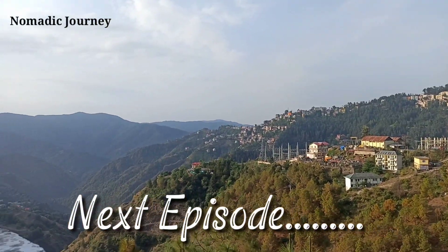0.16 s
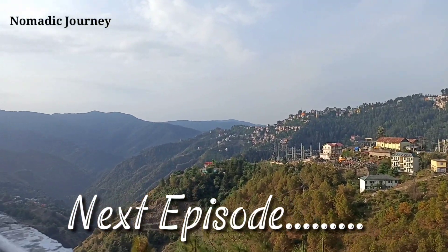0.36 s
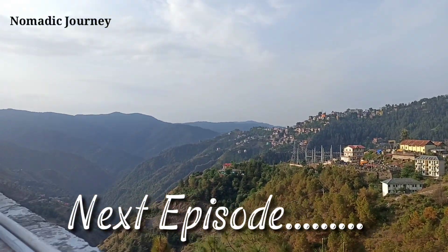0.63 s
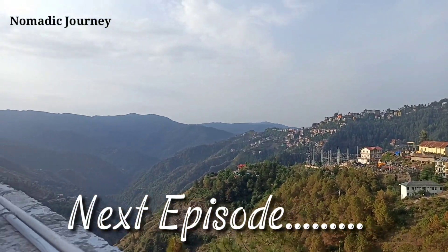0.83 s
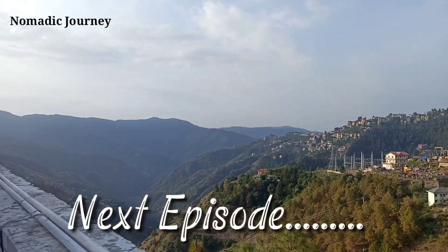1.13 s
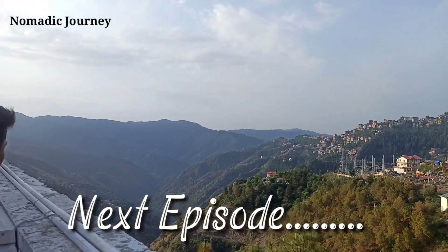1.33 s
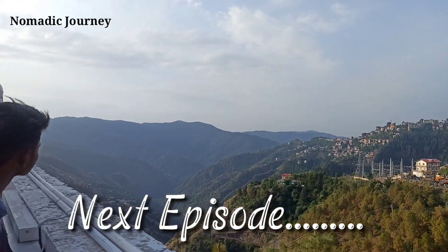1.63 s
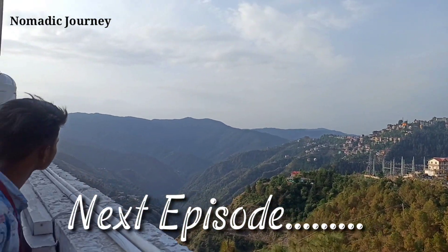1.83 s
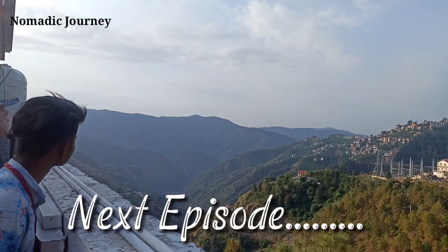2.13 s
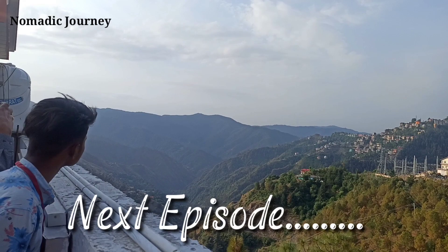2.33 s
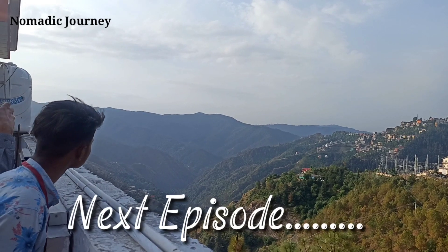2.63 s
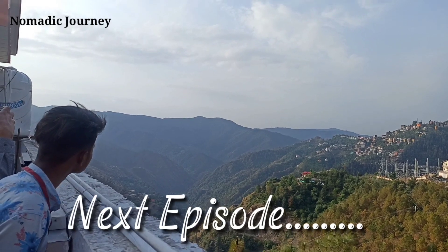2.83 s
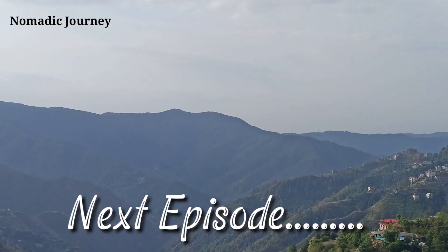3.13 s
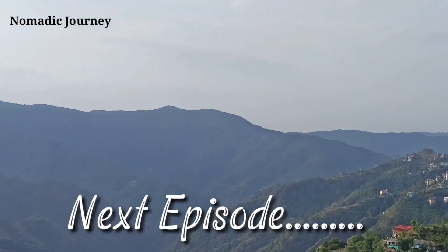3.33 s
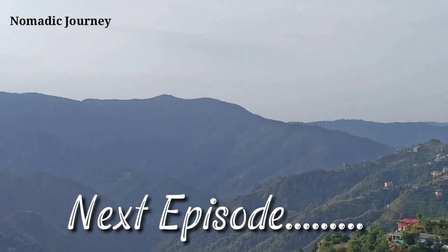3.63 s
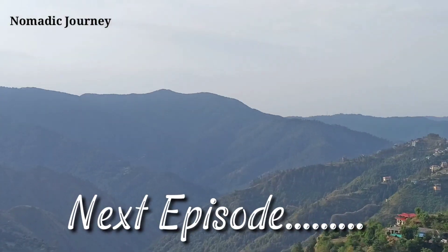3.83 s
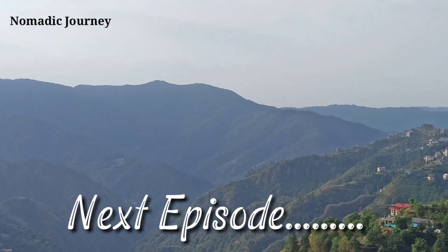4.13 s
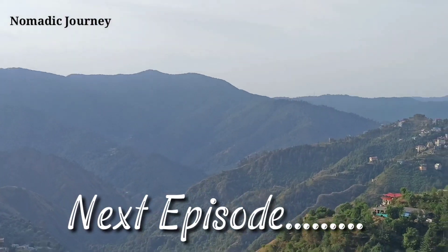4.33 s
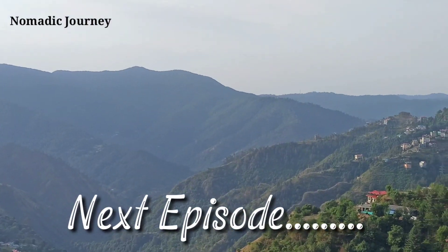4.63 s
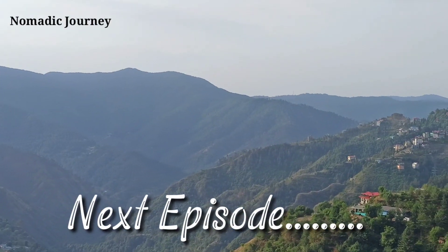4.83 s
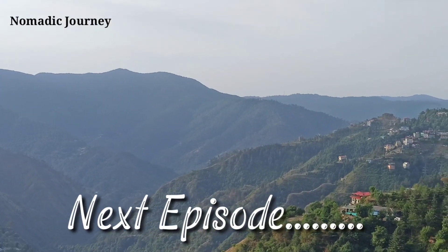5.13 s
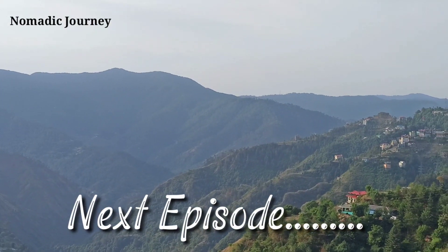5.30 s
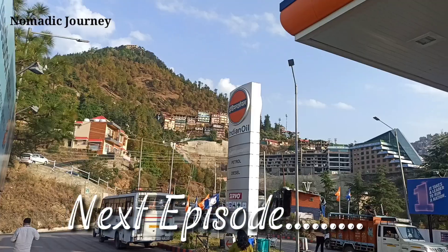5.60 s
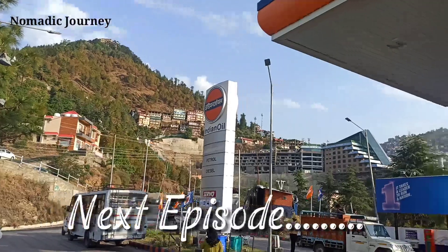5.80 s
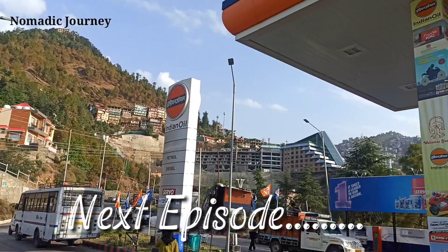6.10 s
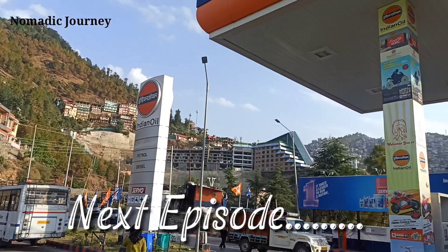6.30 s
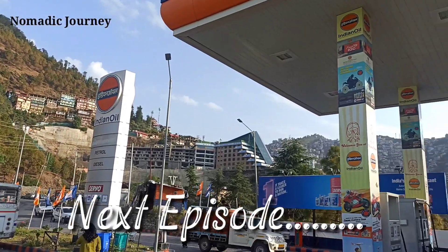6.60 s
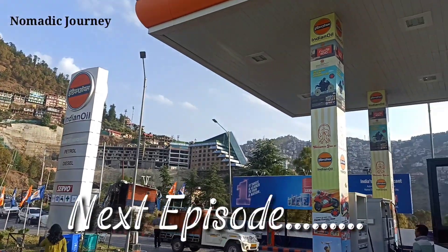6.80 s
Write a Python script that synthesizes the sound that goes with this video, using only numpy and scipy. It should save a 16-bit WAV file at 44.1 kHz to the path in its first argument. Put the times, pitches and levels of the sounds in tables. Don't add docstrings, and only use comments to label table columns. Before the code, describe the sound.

From 0 to 5.6 seconds, an outdoor hillside is dominated by a strong, steady low idle, its main hum near 96 hertz, beating roughly ten times a second against a weaker second engine. A brief hiss dies away at the very start. Soft valley road roar swells gently from about 1.3 seconds, while another vehicle pulls away at 1.3 to 2.2, revs climbing at the end. Tiny birds give short gliding whistles, mostly at 0.5-1.2, 1.7-2, 2.7-3.8 and 4.5-5. Leaves rustle in short gusts; twigs snap near 3.6 and 5.1. At 5.63 everything cuts to a brief silence. From 5.71 a forecourt fades in, full by 5.9: a quieter, higher hum with beating, rapid four-cylinder knocking and metallic panel rattle, puffing exhaust, broad traffic roar, and quick bird chirps at 6.1-6.4 and 6.65-6.8.

```python
import sys
import numpy as np
from scipy import signal
from scipy.io import wavfile
from scipy.ndimage import uniform_filter1d

SR = 44100
rng = np.random.default_rng(int(sys.argv[2]) if len(sys.argv) > 2 else 0)


def field_ratio(decibels):
    return 10 ** (np.asarray(decibels, dtype=float) / 20)


def generate_wav(signal):
    frames = np.transpose(np.atleast_2d(signal))
    scaled = np.clip(frames, -1, 1) * 32767
    pcm = np.round(scaled).astype(np.int16)
    wavfile.write(sys.argv[1], SR, pcm)


N = 306495
T = np.arange(N) / SR

CUT_S, SILENCE_S, RETURN_S = 5.6254, 5.645, 5.708
HILL_CYCLE_HZ, FAST_CYCLE_HZ, KNOCK_CYCLE_HZ = 7.9746, 11.304, 7.087


def evened(x):
    return x / np.sqrt(np.mean(abs(x) ** 2) + 1e-30)


def curve(rows, column=1):
    rows = np.array(rows)
    return np.interp(T, rows[:, 0], rows[:, column])


def bumps(rows):
    t = T[::64]
    swells = sum(high * np.exp(-2 * ((t - s) / half) ** 2) for s, high, half in rows)
    return np.interp(T, t, swells)


def wander(hz):
    t = T[::64]
    rates = np.geomspace(hz / 20, hz, num=12)
    slow = sum(np.sin(2 * np.pi * (f * t + rng.random())) for f in rates)
    return np.interp(T, t, evened(slow))


def sine(phase, db):
    return np.sqrt(2) * field_ratio(db) * np.cos(phase)


def resonate(x, hz, width):
    turn = np.exp(2j * np.pi * np.cumsum(hz * np.ones(len(x))) / SR)
    r = np.exp(-np.pi * width / SR)
    return 2 * (turn * signal.lfilter([1 - r], [1, -r], x / turn)).real


def noise(lo, hi, points=None, patchy_db=1.):
    hz = np.fft.rfftfreq(2048, 1 / SR)
    a, b, patches = rng.standard_normal((N // 512 + 5, len(hz), 3)).T
    patches = uniform_filter1d(patches, size=20, axis=0)
    patches = evened(uniform_filter1d(patches, size=7, axis=1))
    colour = 0 * hz
    if points is not None:
        f, db = np.transpose(points)
        colour = np.interp(np.log(hz + 1), np.log(f + 1), db)
    inside = (hz >= lo) & (hz < hi)
    z = (a + 1j * b) * field_ratio(colour[:, None] + patchy_db * patches) * inside[:, None]
    return evened(signal.istft(z, nperseg=2048, noverlap=1536)[1][:N])


def shelves(edges, levels_db):
    whole = np.fft.rfft(noise(edges[0], edges[-1]))
    hz = np.fft.rfftfreq(N, 1 / SR)
    cuts = [np.fft.irfft(whole * ((hz >= lo) & (hz < hi)), N) for lo, hi in zip(edges, edges[1:])]
    return [field_ratio(db) * evened(cut) for cut, db in zip(cuts, levels_db)]


def engine(angle, orders, orders_db, unsteady_db):
    total = 0
    for k, db in zip(orders, orders_db):
        pipe_shift = .008 * (k - 12) ** 2
        total = total + sine(k * angle + pipe_shift, db + unsteady_db * (.3 - db / 30) * wander(6))
    return total


HILL_ORDERS = [6, 12, 13, 18, 24, 25, 26, 29, 30, 36, 37, 42, 43, 47, 48, 54, 60, 66, 67, 72, 79, 84, 90,
               96]
HILL_ORDER_DB = [-36.5, 0.5, -30, -14, -28, -48, -32.5, -33.5, -25.5, -27, -37, -33.5, -40.5, -41.5, -30.5,
                 -38.5, -42.5, -37.5, -31, -36, -51, -41, -49.5, -43]
# (t/s, level/dB)
HUM = [(0.0, -33), (0.31, -32), (0.98, -33), (1.73, -33), (2.54, -34), (5.49, -34.5), (5.6, -33.5)]


def hill_engine(angle):
    return field_ratio(curve(HUM)) * engine(angle, HILL_ORDERS, HILL_ORDER_DB, unsteady_db=0.66)


FAST_ORDERS = [6, 9, 10, 12, 13, 14, 15, 18, 19, 20, 24, 30, 36, 37, 40, 42, 43, 48]
FAST_ORDER_DB = [-19, -20, -18, 0, -17, -22, -15, -12, -20, -22, -15, -16, -15, -24, -23, -24, -23, -22]


def fast_engine(angle):
    return field_ratio(-43) * engine(angle, FAST_ORDERS, FAST_ORDER_DB, unsteady_db=1.2)


# (f/Hz, level/dB, starting phase/rad)
HILL_NEIGHBOURS = [
    (85.82, -48, 3.97),
    (25.8, -63, 0),
    (70, -64, 0),
]
# (f/Hz, level/dB, starting phase/rad)
FAST_NEIGHBOURS = [
    (122.85, -47, 0),
    (36, -73, 0),
]


def neighbours(lines, t):
    return sum(sine(2 * np.pi * hz * t + start, db + 0.5 * wander(0.82)) for hz, db, start in lines)


# (t/s, firing f/Hz, level/dB)
PULLING = [
    (.9, 48.5, -72),
    (1.3, 50, -55),
    (1.7, 52.5, -52),
    (2, 54.8, -50),
    (2.09, 58, -48.5),
    (2.17, 65, -50),
    (2.23, 69, -75),
]


def pulling_away():
    phase = 2 * np.pi * np.cumsum(curve(PULLING)) / SR
    orders = sum(sine(k * phase, db) for k, db in zip(range(2, 7), [-5, 0, -5, -14, -15]))
    passing = (T > PULLING[0][0]) * (T < PULLING[-1][0])
    return orders * field_ratio(curve(PULLING, column=2)) * passing


PANEL_HZ = [540, 595, 650, 828, 893, 952, 1100, 1240, 1380, 1460, 2000, 2650]
PANEL_WIDTH_HZ = [25, 10, 50, 25, 15, 10, 25, 25, 10, 25, 200, 110]
PANEL_DB = [-62, -57, -61, -57, -63, -61, -66, -65, -60, -63, -70, -66]
CYLINDERS = [1, -.6, .7, .6]


def knocking():
    start = int(CUT_S * SR)
    at = (np.arange(5.748, T[-1], 1 / KNOCK_CYCLE_HZ / 4) * SR).astype(int) - start
    even, uneven, tick = np.zeros((3, N - start))
    even[at] = field_ratio(.8 * rng.standard_normal(len(at)))
    uneven[at] = even[at] * np.resize(CYLINDERS, len(at))
    tick[at[::4]] = even[at[::4]]
    rings = 0
    for hz, width, db in zip(PANEL_HZ, PANEL_WIDTH_HZ, PANEL_DB):
        blow = even if hz < 700 else uneven if hz < 1700 else tick
        ring = resonate(resonate(blow, hz, 4 * width), hz, width)
        rings = rings + field_ratio(db) * evened(ring)
    dulled = signal.sosfilt(signal.butter(6, 3500, fs=SR, output="sos"), rings)
    return np.pad(dulled, (N - len(dulled), 0))


def chug(t):
    since = (t + 0.011) % (1 / KNOCK_CYCLE_HZ) / .008
    air = noise(700, 3300, [(700, -2), (1400, 3), (1800, -5), (2300, 1), (2650, 9), (2950, -4), (3300, -8)])
    return air * field_ratio(-50) * since * np.exp(1 - since)


# (t/s, length t/s, start f/Hz, end f/Hz, level/dB)
HIGH_BIRD = [(0.572, 0.06, 4480, 4620, -56), (.6, 0.07, 4730, 4750, -59), (0.795, .065, 4660, 4750, -58.5),
             (0.93, 0.12, 4500, 4680, -56.5), (1.089, 0.054, 4470, 4550, -52), (1.17, .06, 4530, 4450, -64),
             (2.737, 0.051, 4530, 4600, -56.5), (2.926, 0.047, 4720, 4490, -52),
             (3.39, 0.045, 4400, 4600, -63), (3.67, 0.066, 4420, 4700, -54.5),
             (3.75, 0.024, 4540, 4520, -64), (4.491, 0.039, 4540, 4630, -50),
             (4.568, 0.087, 4695, 4680, -47.5), (4.61, 0.11, 4680, 4480, -56), (4.74, .1, 4420, 4400, -65),
             (4.94, .06, 4400, 4400, -61.5)]
MIDDLE_BIRD = [(0.058, 0.1, 3930, 4000, -59.5), (.17, 0.046, 3750, 4050, -65.5),
               (.2, 0.066, 4200, 4310, -62.5), (.74, .035, 4150, 4080, -68), (1.25, .03, 4300, 3950, -64),
               (2.8, 0.067, 4170, 4000, -64), (3.033, 0.055, 4070, 3900, -48.5),
               (3.42, 0.063, 4200, 3830, -60.5)]
LOW_BIRD = [(2.772, 0.021, 3230, 3090, -61), (2.848, 0.027, 2955, 3300, -55),
            (2.961, 0.053, 2950, 2810, -64), (3.004, 0.036, 2700, 3600, -53.5),
            (3.077, 0.033, 3753, 2720, -49.5), (3.154, 0.032, 2674, 3560, -53.5),
            (3.215, .018, 3210, 2750, -64), (3.358, 0.024, 3134, 3070, -70),
            (3.508, 0.089, 2810, 3250, -59.5), (3.641, 0.033, 3180, 3300, -61.5),
            (3.75, 0.018, 3170, 3050, -68), (3.798, 0.033, 3020, 3420, -66),
            (4.52, 0.024, 2680, 3320, -58.5), (4.584, 0.05, 2890, 3300, -56.5),
            (4.673, 0.024, 3280, 3020, -58.5), (4.72, .04, 3200, 3080, -63),
            (4.909, 0.029, 3030, 3200, -65), (5.001, 0.032, 3080, 3030, -63), (3.92, .03, 3080, 3250, -69)]
WHISTLER = [
    (1.684, .05, 1863, 2630, -54),
    (1.782, 0.036, 2298, 1770, -54),
    (1.98, 0.058, 2145, 2610, -55),
]
FAST_LOW_BIRD = [(6.088, .028, 3970, 4860, -55), (6.145, 0.016, 4700, 4070, -54),
                 (6.35, .02, 4080, 3700, -60), (6.49, 0.015, 3780, 3820, -59),
                 (6.646, .02, 4120, 4320, -55), (6.692, 0.02, 4500, 4020, -50.5),
                 (6.735, 0.039, 3910, 4700, -48), (6.775, 0.016, 4430, 3800, -52)]
FAST_HIGH_BIRD = [(6.106, 0.028, 6400, 6230, -51.5), (6.11, 0.076, 5830, 5550, -62),
                  (6.155, .03, 6250, 6300, -58), (6.205, 0.02, 6480, 6900, -49),
                  (6.3, 0.0079, 6180, 6080, -59), (6.338, 0.033, 6750, 6700, -55),
                  (6.342, 0.024, 6250, 6250, -56), (6.66, 0.038, 5830, 5600, -53.5)]


def whistle(length, hz0, hz1, db, blur):
    t = np.linspace(0, 1, int(length * SR))
    hz = hz0 + (hz1 - hz0) * t
    fuzz = rng.standard_normal(len(t))
    for width in (2 * blur, 2 * blur, blur):
        fuzz = resonate(fuzz, hz, width)
    clear = sine(2 * np.pi * np.cumsum(hz) / SR, -blur / 40)
    return field_ratio(db) * (min(blur / 120, 1) * evened(fuzz) + clear) * np.sin(np.pi * t) ** .6


def birds():
    out = np.zeros(N)
    flock = [(HIGH_BIRD, 185), (MIDDLE_BIRD, 190), (LOW_BIRD, 150), (WHISTLER, 50),
             (FAST_LOW_BIRD, 120), (FAST_HIGH_BIRD, 180)]
    for notes, blur in flock:
        for s, *shape in notes:
            note = whistle(*shape, blur)
            out[int(s * SR):][:len(note)] += note
    t = T[:6000]
    trees = rng.standard_normal(len(t)) * field_ratio(-60 * t / .15) * (t > .006)
    return out + field_ratio(-6) * signal.oaconvolve(out, trees / np.linalg.norm(trees))[:N]


# (t/s, level/dB, centre f/Hz, width f/Hz)
SNAPS = [
    (0.309, -73, 5000, 1680),
    (.6, -81, 8330, 497),
    (1.362, -78, 9800, 3000),
    (3.541, -67, 1720, 796),
    (3.625, -61, 4900, 1000),
    (3.641, -60.5, 1730, 800),
    (5.088, -60.5, 5300, 1200),
    (5.088, -70.5, 9800, 2940),
]


def snaps():
    out = np.zeros(N)
    t = np.arange(1500) / SR
    for s, db, hz, width in SNAPS:
        band = signal.butter(4, [hz - width / 2, hz + width / 2], "band", fs=SR, output="sos")
        burst = evened(signal.sosfilt(band, rng.standard_normal(len(t))))
        swell = (t / 0.0014) * np.exp(1 - t / 0.0039)
        out[int((s - .004) * SR):][:len(t)] += field_ratio(db) * burst * swell
    return out


# (f/Hz, level/dB per Hz)
HILL_ROAR = [(12, -59), (20, -33.5), (38, -25), (63, -14), (97, -7.5), (120, -12.5), (189, -21),
             (293, -19.5), (469, -26), (537, -23.5), (750, -36), (980, -75), (1650, -120)]
# (f/Hz, level/dB)
HILL_MID = [(440, -32), (750, -3), (829, -5), (1080, -8), (1370, 1.5), (1470, 0.5), (1620, -4.5),
            (2080, -4), (2240, 1), (2390, -2.5), (3170, -5.5), (3350, -11), (4360, -41), (7370, -120)]
# (t/s, level/dB)
ROAD = [(0, -4.5), (.7, -3), (1.35, 2), (2.1, 2), (2.65, 0), (3.1, 2), (3.6, 0.5), (4.4, -1), (5.6, 0)]


def hill_roar(puffing, gusts):
    low = noise(20, 750, HILL_ROAR) * field_ratio(-49.5)
    middle = noise(750, 3350, HILL_MID) * field_ratio(-57.5 + .1 * gusts) * puffing
    dull = signal.sosfiltfilt(signal.butter(3, 1900, fs=SR, output="sos"), middle)
    road = curve(ROAD)
    return low + dull * field_ratio(0.71 * road) + (middle - dull) * field_ratio(0.52 * road)


# (t/s, rise level/dB, half length t/s)
GUSTS = [(0.01, 6, 0.13), (.31, 3, .03), (.51, 7, .04), (.86, 1, .04), (1.365, 5, 0.019), (2.22, 4, .06),
         (2.8, 1, .08), (3.03, 5.5, 0.066), (3.46, 5, .07), (3.54, 10.5, 0.016), (3.63, 7, 0.067),
         (4.4, 4, .05), (4.6, 3.5, .06), (4.76, 8, 0.037), (5.08, 12, 0.053), (5.6, 3, 0.055)]
HILL_EDGES = [3350, 4280, 4820, 5380, 5980, 6700, 8180, 11900, 15500]
HILL_SHELF_DB = [-67.5, -65.5, -69, -75, -93.5, -94.5, -78, -105]


def hill_treble(puffing, gusts):
    far, *near, dip, rustle, top = shelves(HILL_EDGES, HILL_SHELF_DB)
    chatter = bumps([(note[0], 1, 0.11) for note in LOW_BIRD + MIDDLE_BIRD])
    near.append(far * field_ratio(-2.0 + curve(ROAD) + 3 * np.sqrt(chatter)))
    leaves = (rustle + .6 * resonate(rustle, 9250, 500)) * field_ratio(gusts - 2.5)
    return sum(near) * puffing + dip + top + leaves


# (f/Hz, level/dB)
FAST_ROAR = [(170, -3), (410, -5.5), (600, -6), (830, -5.5), (1030, -12.5), (1400, -12), (1700, -14),
             (2300, -10.5), (2970, -15.5), (4780, -17.5)]


def fast_roar(t):
    sag = (t + .009) * KNOCK_CYCLE_HZ % 1 - .5
    roar = noise(170, 4780, FAST_ROAR) * field_ratio(-45 - 3 * sag)
    return roar + noise(48, 170, [(48, -8), (100, 0), (170, 0)]) * field_ratio(-54)


FAST_EDGES = [4780, 6080, 6850, 7680, 8500, 9500, 11600, 15500]
FAST_SHELF_DB = [-64.5, -62, -64.5, -73.5, -90.5, -92.5, -75.5]


def fast_treble(t):
    *near, top = shelves(FAST_EDGES, FAST_SHELF_DB)
    return sum(near) + top * field_ratio(2.2 * np.cos(2 * np.pi * 4 * KNOCK_CYCLE_HZ * t + 1.))


def settling():
    return noise(250, 5970, [(250, 2.5), (1200, 6.0), (5900, -10)], patchy_db=2) * field_ratio(-45 - 184 * T)


# (f/Hz, level/dB)
WHINE = [
    (13168.8, -101),
    (13360.1, -101),
    (13015.6, -112),
]


def whine():
    return sum(sine(2 * np.pi * hz * T, db) for hz, db in WHINE)


def hillside():
    angle = 2 * np.pi * HILL_CYCLE_HZ * T + .457
    puffing = field_ratio(0.99 * np.cos(6 * angle))
    gusts = bumps(GUSTS)
    engines = hill_engine(angle) + neighbours(HILL_NEIGHBOURS, T) + pulling_away()
    air = hill_roar(puffing, gusts) + hill_treble(puffing, gusts)
    return engines + air + settling() + whine()


def fast_scene():
    t = T - 5.9
    angle = 2 * np.pi * FAST_CYCLE_HZ * t + .483
    engines = fast_engine(angle) + neighbours(FAST_NEIGHBOURS, t) + knocking() + chug(t)
    return engines + fast_roar(t) + fast_treble(t)


def remnant():
    fall = field_ratio(-68 - 900 * (T - CUT_S).clip(0))
    return noise(30, 700) * fall * (T >= CUT_S) * (T < SILENCE_S)


# (t/s, level/dB)
FADE = [
    (5.708, -45),
    (5.72, -25),
    (5.735, -17),
    (5.76, -12),
    (5.8, -9),
    (5.84, -4),
    (5.9, 0),
]


def scene():
    small = birds() + snaps()
    before = (hillside() + small) * (T < CUT_S)
    after = (fast_scene() + small) * field_ratio(curve(FADE)) * (T > RETURN_S)
    return (before + remnant() + after)[None]


def low_pass(x):
    return signal.sosfilt(signal.butter(12, 15550, fs=SR, output="sos"), x)


def record(dry):
    return low_pass(dry)


dry = scene()
out = record(dry)
generate_wav(out)
```